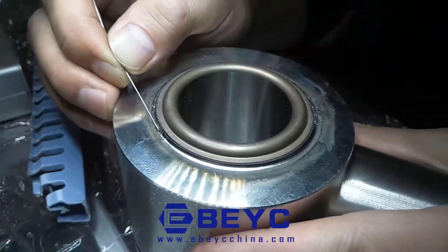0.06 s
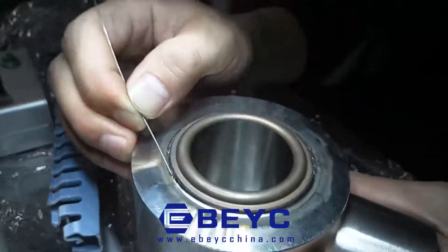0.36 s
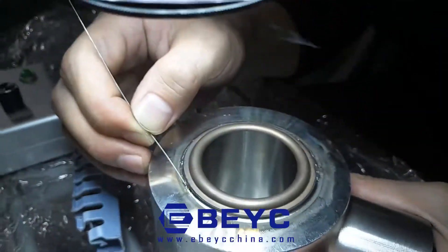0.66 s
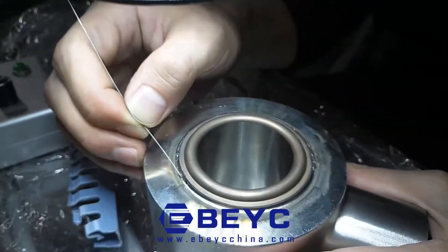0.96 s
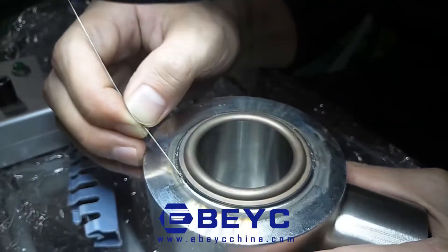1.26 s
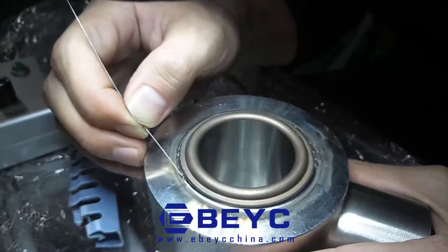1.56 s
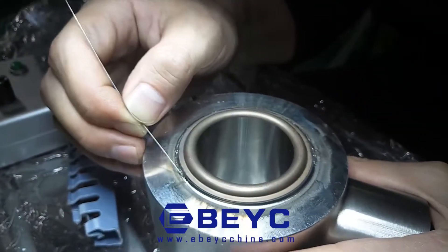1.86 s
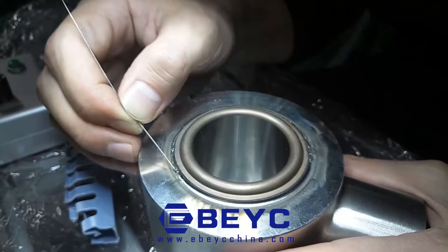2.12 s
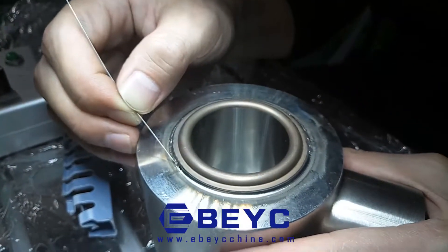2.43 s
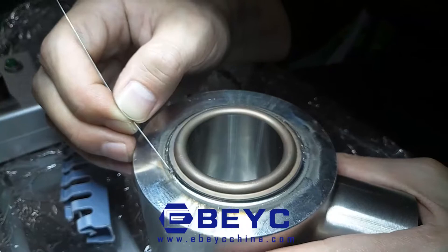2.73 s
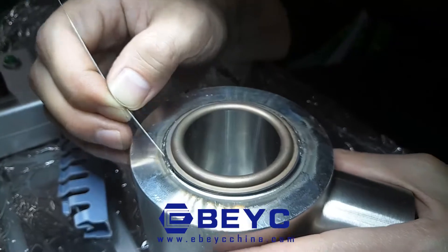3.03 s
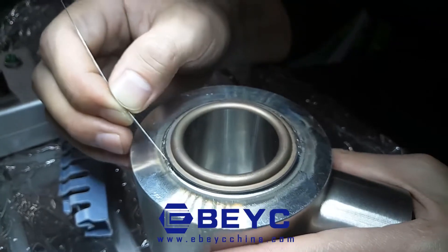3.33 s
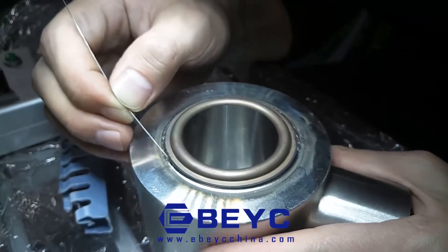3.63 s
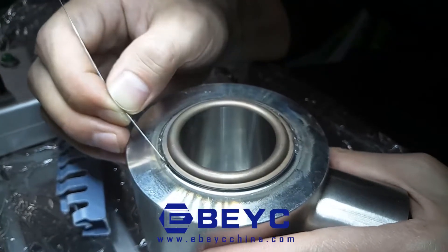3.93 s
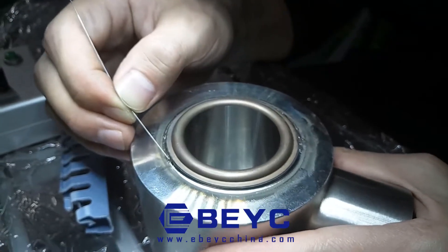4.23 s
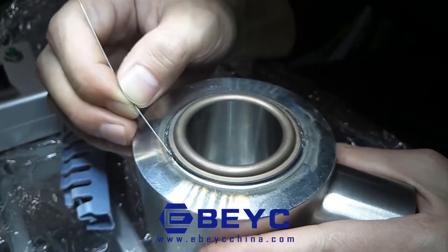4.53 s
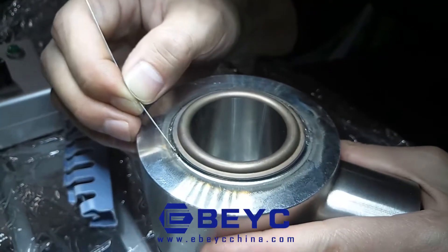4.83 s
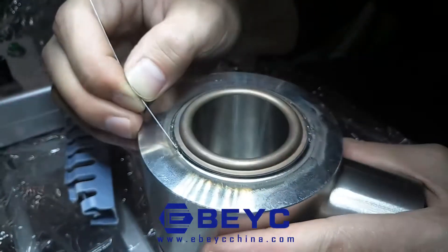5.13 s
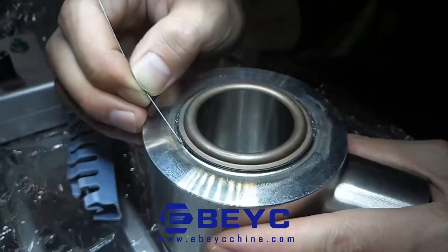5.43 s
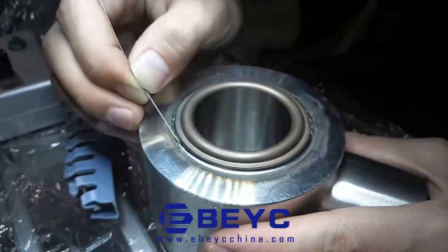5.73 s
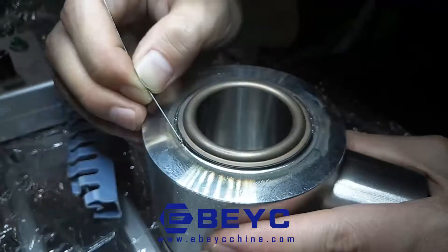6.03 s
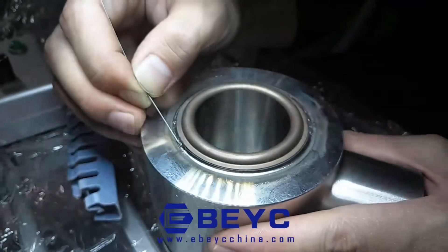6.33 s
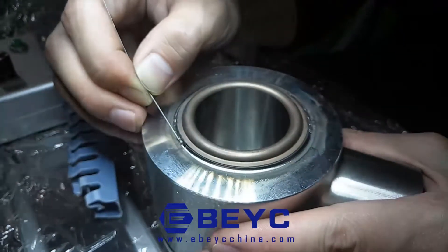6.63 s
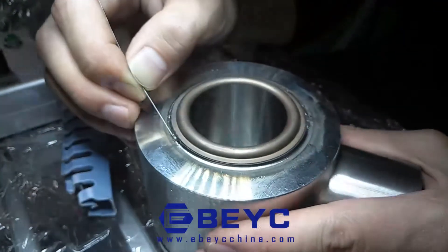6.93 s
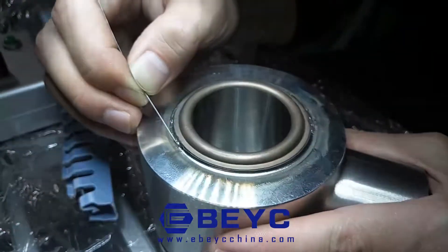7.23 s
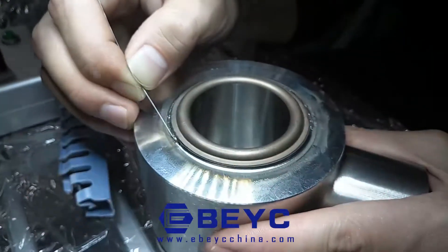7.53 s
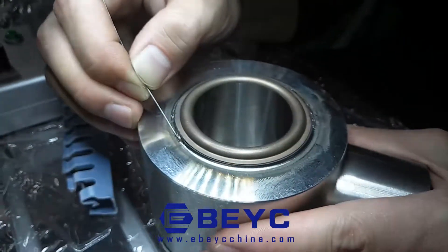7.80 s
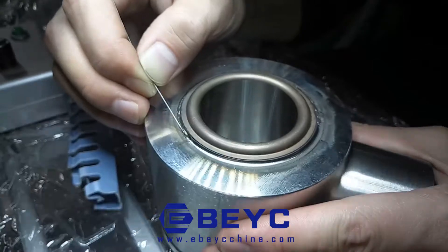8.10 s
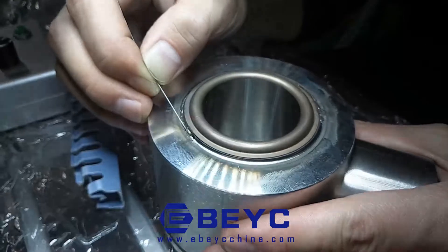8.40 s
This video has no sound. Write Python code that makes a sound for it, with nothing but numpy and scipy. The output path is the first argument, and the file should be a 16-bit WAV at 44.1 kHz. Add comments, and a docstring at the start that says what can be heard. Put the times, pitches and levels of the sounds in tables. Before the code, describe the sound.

Steady machine hum and rushing fans fill a workshop while, close to the microphone and slightly left, a laser welder cracks against steel. The evenly spaced snaps, each with a tiny metallic ring, come in three trains: a pair, a medium run, then a long one. Shield gas hisses briefly as the last two begin, a very high fizz precedes some ticks, and a short scraping burst closes it.

```python
"""Sharp metallic ticks, five a second in three trains, snap over a steady machine hum.
A pulsed laser is welding filler wire onto a steel bearing: each shot cracks, rings the workpiece and
knocks in the laser head. Shield gas spurts as the two long trains start; the cooler's pump and fans hum.
A very high fizz flicks ahead of some ticks, and a short, bright, scraping burst comes at the very end.
A close phone's limiter ducks everything around each shot."""
import sys
import numpy as np
from scipy import signal
from scipy.fft import rfft, irfft
from scipy.io import wavfile
from scipy.ndimage import uniform_filter1d, minimum_filter1d

SR = 44100
rng = np.random.default_rng(int(sys.argv[2]) if len(sys.argv) > 2 else 0)


def file_out(sig):
    """Save sig as 16-bit WAV at sys.argv[1]."""
    # one column per channel
    cols = np.atleast_2d(sig).T
    # limit, then scale
    lim = np.clip(cols, -1, 1)
    pcm = np.round(lim * 32767).astype(np.int16)
    wavfile.write(sys.argv[1], SR, pcm)


N = 377496
T = np.arange(N) / SR
FREQ = np.maximum(np.arange(N // 2 + 1) * SR / N, 1)

# laser shots: (time [s], squeal [dB], crack left [dB], crack right [dB], ring left [dB], ring right [dB])
SHOTS = [(0.043, 22, 8, 3, 8, -9), (0.2433, 21, 7, -12, 7.5, -11), (1.0634, 24, 13, -8, 9, 7),
         (1.2637, 22, 9.5, -5, 4, 3), (1.4637, 18.5, 4, -9, 4.5, 1), (1.6643, 18, 3.5, -13, 0.5, 1),
         (1.8642, 21, 7.5, -6, 6, 0), (2.0647, 25.5, 12.5, -24, 9.5, -4), (2.265, 24.5, 11, -26, 11.5, -6),
         (2.4651, 26.5, 15, -17, 13.5, -1), (2.6653, 27.5, 15.5, -13, 14, -3),
         (2.8659, 24.5, 19, -10, 11.5, 4), (4.8815, 24.5, 14.5, -25, 13, -15), (5.0815, 26, 16, 1, 9, 10),
         (5.2816, 20.5, 6.5, -3.5, 7.5, 3), (5.4819, 22.5, 9.5, -2, 8.5, 4), (5.6821, 24, 11, 0, 10.5, 2),
         (5.8825, 24.5, 12.5, -2, 11, 7), (6.083, 24, 11, -2, 10.5, 3), (6.282, 26.5, -25, -9, 8, 6.5),
         (6.4827, 20.5, 8.5, -12, 7, 6), (6.6829, 21.5, -18, -9, 5.5, 0), (6.883, 23.5, -17, -23, 3.5, -6),
         (7.0843, 26, 12.5, -24, 13, -3), (7.2844, 24.5, -19, -19, 6, -4), (7.4841, 21.5, -17, -8, 1.5, 0),
         (7.6846, 15, -26, -16, -2, -7), (7.885, 22, -17, -7, 5, 7.5), (8.0853, 24.5, -13, -15, 9, -2),
         (8.2854, 23.5, -8, -13, 11, -1.5), (8.486, 26.5, -2, -10, 14.5, 7)]
# bright colour of the vapour plume's crack: (frequency [Hz], level [dB])
CRACK_COLOUR = [(500, -16), (2500, -23.5), (3800, -12), (4700, 0), (6200, 4.5), (8000, -4), (10000, -11),
                (12000, -11.5), (14000, -29), (16000, -27)]


def shots(right_lead_s=0.00014, knock_delay_s=0.00345, knock_right_db=-1, tick_s=0.00033):
    """The vapour plume cracks, the laser head knocks just after, and twice a spatter pop follows."""
    # body of the knock: (frequency [Hz], level [dB])
    knock_colour = [(100, 6), (400, 9), (1000, -4), (2500, 0.5), (4000, 11), (6500, -0.5), (9000, -34),
                    (14000, -15)]
    # spatter pops, heard as a second tick: (time [s], level [dB])
    spatter_pops = [(1.4674, 2), (5.285, 1)]
    out, t = np.zeros((2, N)), np.arange(SR // 110) / SR
    crack, knock = response(CRACK_COLOUR), response(knock_colour)
    for s, _, left_db, right_db, *_ in SHOTS:
        sides = [(s, left_db, 0), (s - right_lead_s, right_db, knock_right_db)]
        for ear, (start, crack_db, knock_db) in zip(out, sides):
            add(ear, start - 0.0001, undb(crack_db) * crack)
            add(ear, start + knock_delay_s, undb(knock_db) * knock)
    for s, db in spatter_pops:
        for ear, gain in zip(out, pan_left(right_db=-4)):
            add(ear, s, undb(db) * gain * burst(np.exp(-t / tick_s), crack))
    return out


def rings(delay_s=0.0003, attack_s=0.00035, detune=0.0043, scatter_db=2, modes_db=-4,
          rattle_s=0.002, rattle_db=-5):
    """Each shot rings the workpiece in nearly the same way, with a short rattle on top."""
    # modes of the steel: (frequency [Hz], level [dB], t60 [s])
    steel_modes = [(3404, -10, 0.015), (4660, -14, .012), (5050, 1.5, 0.017), (5350, 0.5, 0.019),
                   (5620, -4, 0.016), (6490, 2.5, 0.02), (6730, -7.5, 0.011), (7300, -6, 0.015),
                   (7800, -20, .012), (9170, -16, .012)]
    # colour of the rattle: (frequency [Hz], level [dB])
    rattle_colour = [(200, -24), (900, -15), (2200, -5), (3500, -11), (4300, -5), (5100, -4), (6500, 0),
                     (7400, -13), (10000, -11), (13500, -11), (15200, 0), (16500, -22)]
    out, t = np.zeros((2, N)), np.arange(SR // 50) / SR
    hz, db, t60 = np.transpose(steel_modes)[:, :, None]
    colour, phases = response(rattle_colour), rng.random((2, len(steel_modes), 1))
    attack, decay = np.minimum(t / attack_s, 1), np.exp(-np.log(1000) * t / t60)
    for s, _, _, _, *levels_db in SHOTS:
        for ear, level_db, phase in zip(out, levels_db, phases):
            pitch, strength = rng.standard_normal((2, len(steel_modes), 1))
            modes = np.sin(2 * np.pi * (hz * (1 + detune * pitch) * t + phase)) * decay
            ring = unit(np.sum(undb(db + scatter_db * strength) * modes, axis=0) * attack)
            rattle = burst(np.exp(-t / rattle_s), colour)
            add(ear, s + delay_s, undb(level_db + modes_db) * ring)
            add(ear, s + delay_s, undb(level_db + rattle_db) * rattle)
    return out


def room_spill(send_db=-14, t60_s=0.34, predelay_s=0.0097, damping_hz=9000):
    """The crack is beamed; what spills into the workshop's dull tail follows the strength of the ring."""
    send, crack = np.zeros((1, N)), response(CRACK_COLOUR)
    for s, *_, ring_left_db, _ in SHOTS:
        add(send[0], s, undb(ring_left_db + send_db) * crack)
    t = np.arange(SR // 2) / SR
    decay = np.exp(-np.log(1000) * t / t60_s) * (t > predelay_s)
    tail = unit(rng.standard_normal((2, len(t))) * decay)
    tail = signal.lfilter(*signal.butter(2, damping_hz, fs=SR), tail)  # air and walls swallow the top
    return signal.fftconvolve(send, tail, axes=-1)[:, :N] * pan_left(right_db=-9)


def ultrasound(hz=21000):
    """Every shot also squeals just above hearing, which drives the limiter."""
    out, t = np.zeros(N), np.arange(SR // 1000) / SR
    squeal = unit(np.hanning(len(t)) ** 2 * np.sin(2 * np.pi * hz * t))
    for s, db, *_ in SHOTS:
        add(out, s, undb(db) * squeal)
    return out


def spurts_and_scrape(attack_s=0.0073, kick_s=0.038, hold_s=0.1, fall_db_per_s=85, flutter_db=0.9):
    """The gas valve opens twice with a kick of stored pressure; a bright scrape comes at the very end."""
    # two gas spurts, then the scraping burst: (time [s], level [dB], opening kick [dB])
    cues = [(1.068, -20, 12.7), (4.888, -18, 7.2), (8.536, -22, 3)]
    # colour common to all three: (frequency [Hz], level [dB])
    colour = [(250, -33), (380, -16), (480, -2.5), (670, -19), (830, -5), (1100, -14.5), (1500, -7.5),
              (2000, 0), (2700, -1.5), (3250, -2), (3900, 0.5), (4750, 0), (5900, 3.5), (6700, 1.5),
              (7450, -4.5), (8300, -13), (12500, -20.5), (14700, -16), (16000, -43)]
    # resonances and hollows, one list a cue: (frequency [Hz], gain [dB])
    resonances = [
        [(1750, 2.5), (3200, -0.5), (4220, 5), (4800, 7.5), (5450, 2), (6720, 7.5), (7350, 9.5)],
        [(3000, 2.5), (3230, -2), (3530, 5), (4100, 0), (4780, 1.5), (5950, -3), (6620, -0.5)],
        [(3360, 12), (5170, 8)],
    ]
    # all sit to the left, so the right gets mostly low body: (frequency [Hz], right gain [dB])
    right_shadow = [(500, -1.5), (2000, -10)]
    out = np.zeros((2, N))
    for (s, db, kick_db), peaks in zip(cues, resonances):
        resonance_db = sum(peak_db * band(hz, width_hz=330) for hz, peak_db in peaks)
        rush = noise(undb(across(colour, FREQ) + resonance_db))
        age = np.maximum(T - s, 0)
        attack = np.minimum(age / attack_s, 1) ** 2
        kick = kick_db * np.exp(-(age / kick_s) ** 2)
        fall = fall_db_per_s * np.maximum(age - hold_s, 0)
        out += rush * attack * undb(db + kick - fall)
    return shade(spread(out), right_shadow) * undb(flutter_db * drift(rate_hz=186))


def high_fizz(width_s=0.00087):
    """Three brief flicks of very high fizz come just ahead of some ticks."""
    # ticks with fizz ahead of them: (time [s], left [dB], right [dB])
    cues = [(0.244, -40, -6), (1.065, -40, 1), (2.0656, -40, 3), (2.2657, -40, 2.5), (2.4654, -40, 4),
            (2.666, -40, 5), (2.8665, -40, 7), (4.8838, -40, 8), (5.0816, -22, -40), (6.2844, 11, -40),
            (6.6843, 4, -40), (6.885, 6, -4), (7.0855, -40, 5), (7.285, 5.5, -2), (7.4847, 2.5, -40),
            (7.6849, -7, -40), (7.8847, 2, -40), (8.0855, 3, 1), (8.284, 0, 0), (8.486, 2.5, 3)]
    # flicks ahead of one tick: (lead [s], level [dB])
    flicks = [(0.018, -7), (0.0095, -2.5), (0.0076, -2.5)]
    # colour of a flick: (frequency [Hz], level [dB])
    flick_colour = [(1500, -21), (5000, -12.5), (8200, -24.5), (9700, -18), (13800, -16.5), (14800, 0),
                    (15400, -4), (16300, -18)]
    out, t = np.zeros((2, N)), np.arange(SR // 100) / SR
    colour, middle = response(flick_colour), t.mean()
    spike = np.exp(-np.abs(t - middle) / width_s)
    for s, *levels_db in cues:
        for lead_s, flick_db in flicks:
            for ear, db in zip(out, levels_db):
                add(ear, s - lead_s - middle, undb(db + flick_db) * burst(spike, colour))
    return out


def nozzle_whistles(sag_hz_per_s=670, core_width_hz=135, air_width_hz=450, air_db=-5):
    """Gas whistles faintly at the nozzle, breathy and sagging in pitch."""
    # whistles: (peak time [s], rise [s], fade [s], pitch at the peak [Hz], level [dB])
    whistles = [(0.46, 0.19, 0.34, 4290, -38.5), (2.4, 0.12, 0.099, 4370, -41.5)]
    tones = np.zeros(N)
    for s, rise, fade, hz, db in whistles:
        pitch_hz = hz - sag_hz_per_s * (T - s)
        envelope = swell(s, 2 * np.where(T < s, rise, fade))
        tones += undb(db) * envelope * np.sin(2 * np.pi * np.cumsum(pitch_hz) / SR)
    core, air = np.exp(-(FREQ / core_width_hz) ** 2), np.exp(-(FREQ / air_width_hz) ** 2)
    turbulence = noise(core + undb(air_db) * air)
    return np.sqrt(2) * tones * turbulence * pan_left(right_db=-10)


def nozzle_hiss():
    """A thin hiss of gas fades up during the last train."""
    # fader ride: (time [s], level [dB])
    fader = [(6.3, -74), (6.6, -56), (7.8, -54), (8.56, -55)]
    # resonances of the hiss: (centre [Hz], width [Hz], level [dB])
    resonances = [(2120, 630, 10), (9400, 780, -12)]
    hiss = sum(undb(db) * noise(band(hz, width)) for hz, width, db in resonances)
    return hiss * ride(fader) * pan_left(right_db=-6)


def swishes():
    """Hands, wire and gas make soft swishes and scuffs, each a swell of band noise."""
    # swishes: (peak time [s], length [s], centre [Hz], width [Hz], level [dB])
    cues = [(0.15, 0.14, 2620, 500, -48), (0.182, 0.34, 5150, 800, -45), (0.316, 0.0034, 5900, 8000, -31),
            (0.33, 0.1, 400, 300, -38), (0.4, 0.72, 5400, 3900, -45), (0.975, 0.041, 5400, 1000, -45),
            (3.08, 0.06, 5100, 2600, -41.5), (3.11, 0.089, 425, 110, -38), (3.176, 0.08, 380, 60, -40),
            (3.78, 0.14, 10200, 2000, -62), (4.787, 0.055, 5400, 2500, -42), (5.61, 0.24, 716, 250, -39)]
    return sum(spread(noise(band(hz, width))) * undb(db) * swell(s, length)
               for s, length, hz, width, db in cues)


def fans(db=-35, swell_db=0.4, flutter_db=1, crossover_hz=800, hiss_db=-63.5):
    """The cooler's fans push rushing air that swells and flutters a little, with a thin hiss on top."""
    # colour of the air: (frequency [Hz], level [dB])
    air_colour = [(25, -26), (65, -16.5), (100, -6), (160, -6), (330, -2), (480, -5), (650, -4), (900, -9),
                  (1180, -8), (1450, -14), (2200, -12), (3300, -13), (4800, -14.5), (5300, -13),
                  (5750, -16.5), (6000, -14), (6700, -16.5), (8100, -33.5), (11000, -36.5)]
    # the fans stand to the left, so the right gets less treble: (frequency [Hz], right gain [dB])
    right_shadow = [(120, 0.5), (300, -5), (550, -2.5), (1000, -1.5), (2200, -8.5), (5000, -9.5),
                    (10000, -20)]
    # slow ride of the treble: (time [s], gain [dB])
    treble_fader = [(0, 0.5), (1.8, -0.8), (2.4, 0.8), (2.9, 0.2), (3.3, -1), (3.75, 0), (4.1, 0.2),
                    (4.6, -1.5), (5.5, -0.5), (8.56, 1)]
    air = shade(spread(noise(undb(across(air_colour, FREQ)))), right_shadow)
    bass = irfft(rfft(air) / (1 + (FREQ / crossover_hz) ** 4), N)
    treble = (air - bass) * ride(treble_fader)
    level = undb(db + swell_db * drift(rate_hz=1) + flutter_db * drift(rate_hz=12))
    hiss = undb(hiss_db) * noise(band(hz=14750, width_hz=1150)) * pan_left(right_db=-6)
    return (bass + treble) * level + hiss


def hum(waver_db=1.5, wander_rad=0.2, ear_rad_per_hz=0.29 / 500):
    """Mains, pump and fan tones waver slightly; the higher ones differ in phase between the ears."""
    # tones: (frequency [Hz], left rms [dB], right rms [dB])
    tones = [(49.4, -63.5, -70), (99.8, -41.5, -42), (149, -51.5, -51.5), (195.6, -57, -52.5),
             (200.2, -51, -55.5), (256.7, -54.5, -52.5), (299.9, -39.5, -44.5), (329.2, -60, -53),
             (441, -73, -53.5), (538.5, -52, -43.5), (559, -48, -48.5), (587.7, -45.5, -45),
             (637, -56.5, -55), (658.7, -54, -52), (686, -58, -48), (699, -63, -58.5)]
    out = np.zeros((2, N))
    for k, (hz, left_db, right_db) in enumerate(tones):
        phase = 2 * np.pi * (hz * T + rng.random()) + wander_rad * drift(rate_hz=1.36)
        shift = (-1) ** k * ear_rad_per_hz * hz
        waver = undb(waver_db * drift(rate_hz=12.5))
        out += undb([[left_db], [right_db]]) * np.sin([phase, phase + shift]) * waver
    return np.sqrt(2) * out


def undb(db):
    """Decibels to gain."""
    return 10 ** (np.asarray(db) / 20)


def ride(points):
    """Gain at every sample from (time [s], level [dB]) fader points."""
    return undb(np.interp(T, *np.transpose(points)))


def swell(s, length):
    """A bell-shaped rise and fall around time s."""
    return np.exp(-(2 * (T - s) / length) ** 2)


def across(points, freq):
    """Read (frequency [Hz], value) points along a log-frequency axis."""
    hz, value = np.transpose(points)
    return np.interp(np.log(freq), np.log(hz), value)


def band(hz, width_hz):
    """Gain of a resonance at each frequency."""
    return 1 / (1 + ((FREQ - hz) / (0.33 * width_hz)) ** 2)


def noise(gain):
    """Two unrelated noises of rms 1, coloured by a gain at each frequency."""
    x = irfft(rfft(rng.standard_normal((2, N))) * gain, N)
    return x / x.std()


def drift(rate_hz):
    """Smooth random modulation of rms about 1."""
    return noise(np.exp(-(FREQ / rate_hz) ** 2))[0]


def unit(x):
    """Scale to an energy of 1."""
    return x / np.sqrt(np.sum(x ** 2, axis=-1, keepdims=True))


def response(points, size=512):
    """A minimum-phase click coloured by (frequency [Hz], level [dB]) points."""
    freq = np.maximum(np.arange(size // 2 + 1) * SR / size, 1)
    cepstrum = irfft(np.log(undb(across(points, freq))))
    cepstrum[1:size // 2] *= 2
    cepstrum[size // 2 + 1:] = 0
    return unit(irfft(np.exp(rfft(cepstrum))))


def burst(envelope, colour):
    """A short coloured noise of energy 1."""
    return unit(np.convolve(envelope * rng.standard_normal(len(envelope)), colour))


def add(out, s, x):
    """Mix x into a track at time s."""
    i = int(round(s * SR))
    out[i:i + len(x)] += x[:max(N - i, 0)]


def pan_left(right_db):
    """Channel gains of a source that sits to the left."""
    return np.array([[1], [undb(right_db)]])


def shade(pair, shadow):
    """Shield the right side by (frequency [Hz], gain [dB]) points."""
    right = irfft(rfft(pair[1]) * undb(across(shadow, FREQ)), N)
    return np.array([pair[0], right])


def spread(pair):
    """Blend two noises as a diffuse room does: centred lows, wide highs."""
    # likeness between the ears: (frequency [Hz], correlation [0..1])
    ear_likeness = [(60, 0.88), (250, 1), (600, 0.81), (1200, 0), (4000, 0.0049)]
    likeness = across(ear_likeness, FREQ)
    mid, side = rfft(pair) * np.sqrt([(1 + likeness) / 2, (1 - likeness) / 2])
    return irfft([mid + side, mid - side], N)


def limiter(x, threshold_db=-2, ahead_s=0.017, hold_s=0.003, release_s=0.029):
    """Looks ahead, turns both channels down before a peak, holds, then recovers."""
    power = uniform_filter1d(np.max(x ** 2, axis=0), SR // 1000)
    over_db = np.maximum(10 * np.log10(np.maximum(power, 1e-12)) - threshold_db, 1e-9)
    size = int((ahead_s + hold_s) * SR)
    held_db = -minimum_filter1d(-over_db, size, origin=size // 2 - int(ahead_s * SR))
    # each cut dies away exponentially unless a deeper one takes over
    cut_db = np.exp(np.maximum.accumulate(np.log(held_db) + T / release_s) - T / release_s)
    return x * undb(-uniform_filter1d(cut_db, SR // 250))


def scene():
    """Welding up close, then fizz, spurts and small noises, with the cooler's bed behind them."""
    welding = shots() + rings() + ultrasound()
    details = high_fizz() + room_spill() + spurts_and_scrape()
    nozzle = nozzle_whistles() + nozzle_hiss()
    return welding + details + nozzle + swishes() + fans() + hum()


def record(dry):
    """The phone limits the peaks, then cuts the top and the squeal with it."""
    top_hz = 16500
    lowpass = signal.ellip(12, 0.2, 100, top_hz, fs=SR, output="sos")
    return signal.sosfilt(lowpass, limiter(dry))


dry = scene()
out = record(dry)
file_out(out)
```